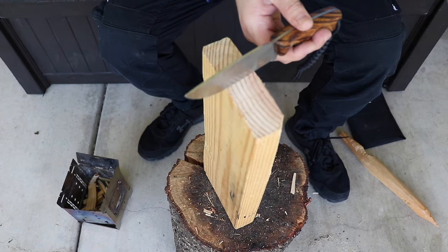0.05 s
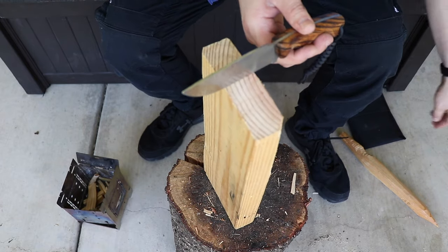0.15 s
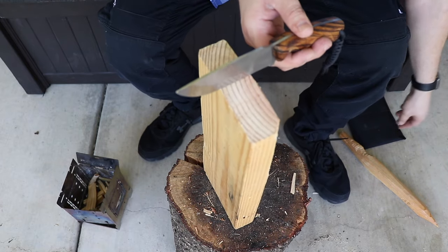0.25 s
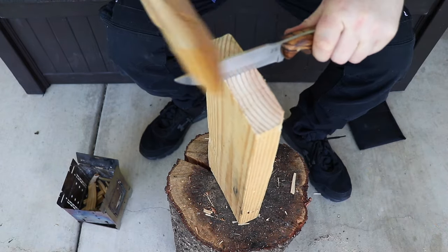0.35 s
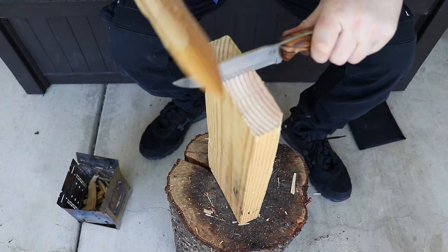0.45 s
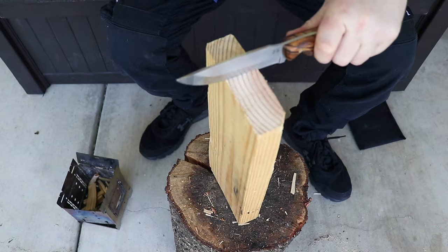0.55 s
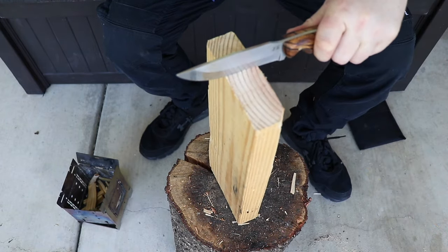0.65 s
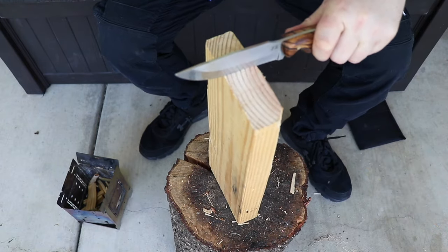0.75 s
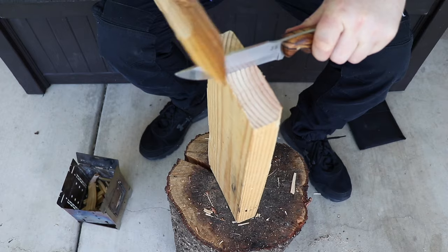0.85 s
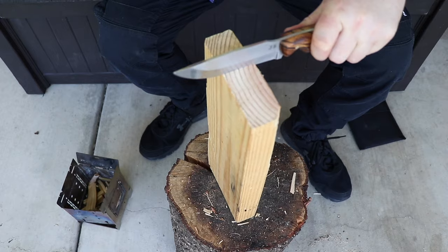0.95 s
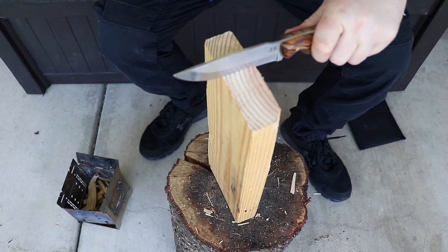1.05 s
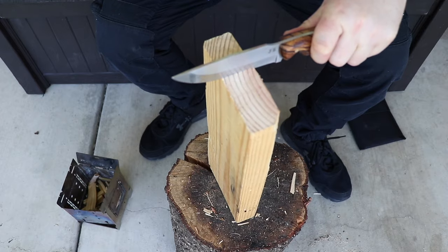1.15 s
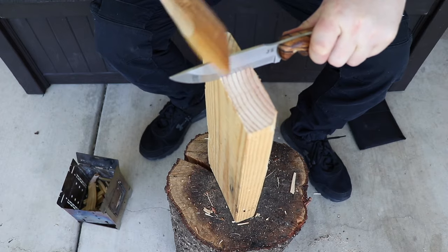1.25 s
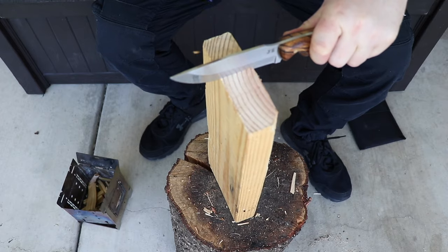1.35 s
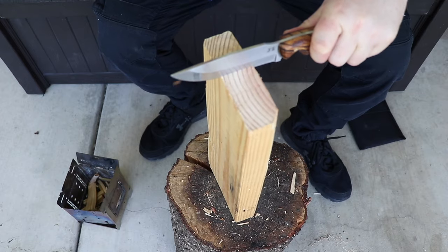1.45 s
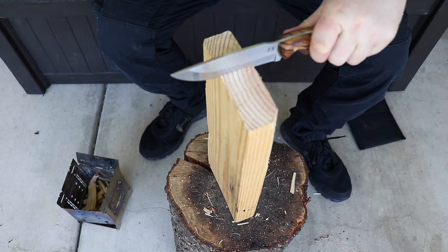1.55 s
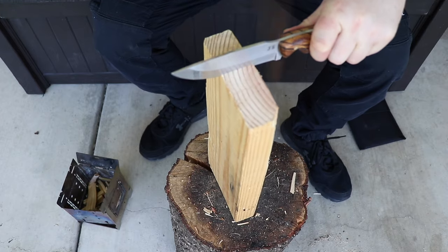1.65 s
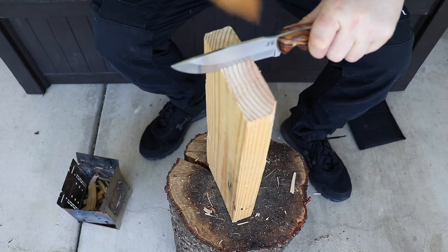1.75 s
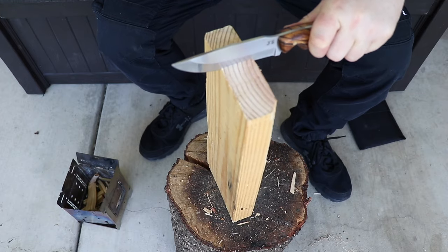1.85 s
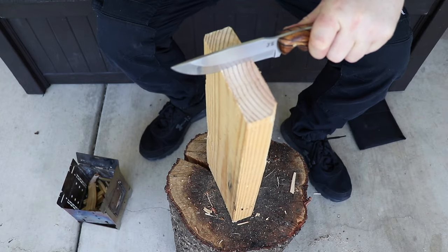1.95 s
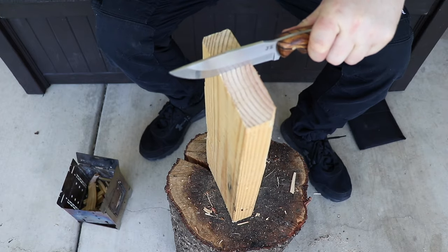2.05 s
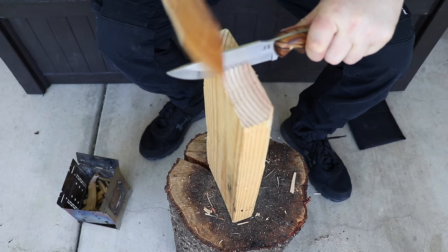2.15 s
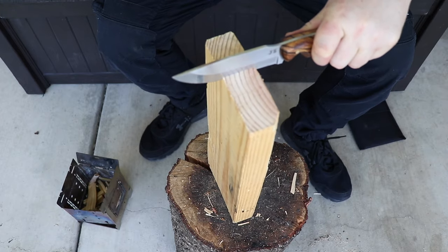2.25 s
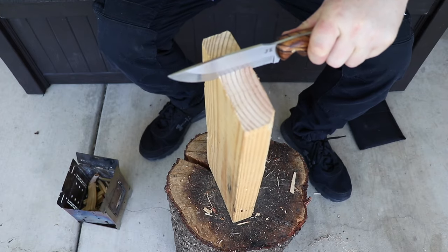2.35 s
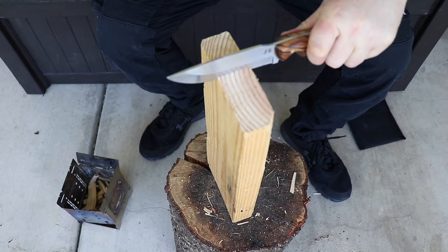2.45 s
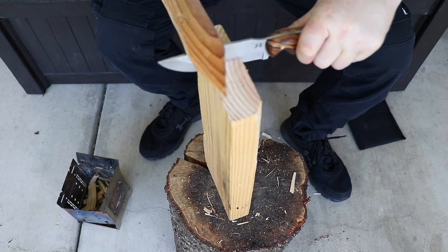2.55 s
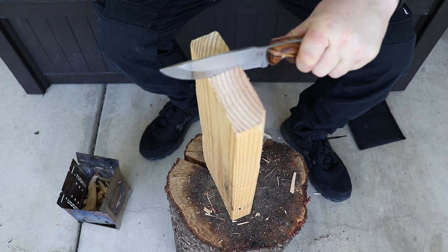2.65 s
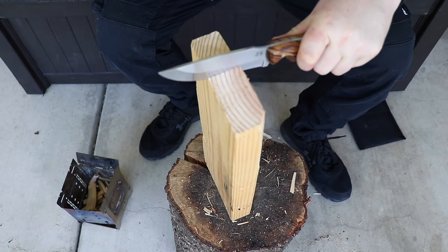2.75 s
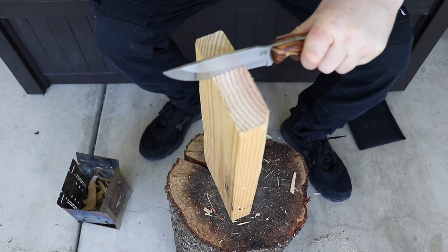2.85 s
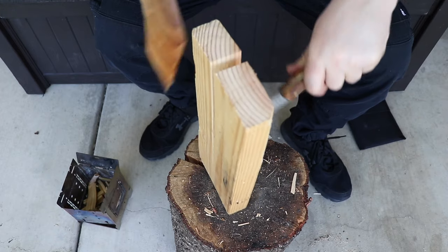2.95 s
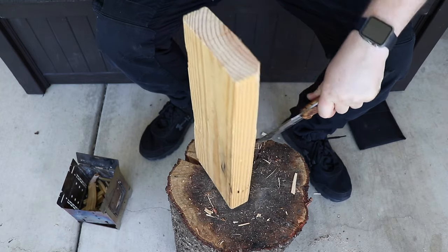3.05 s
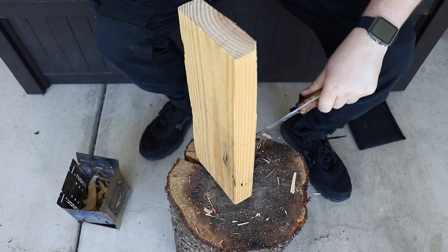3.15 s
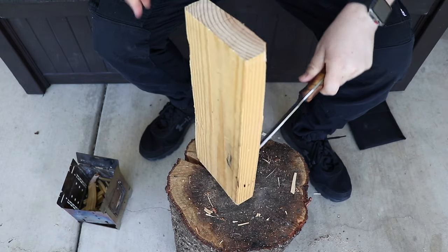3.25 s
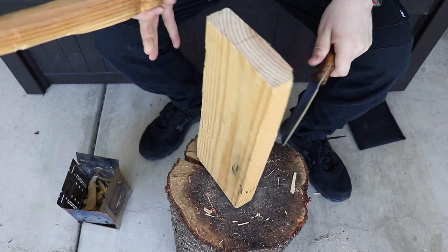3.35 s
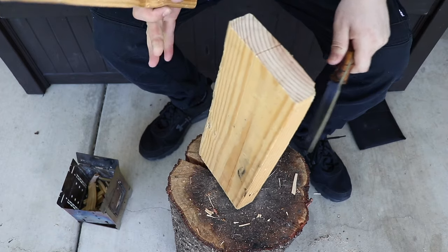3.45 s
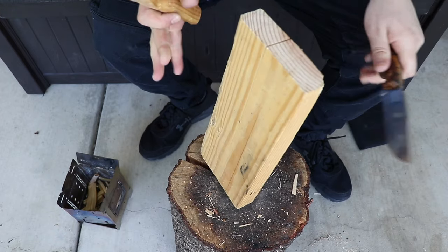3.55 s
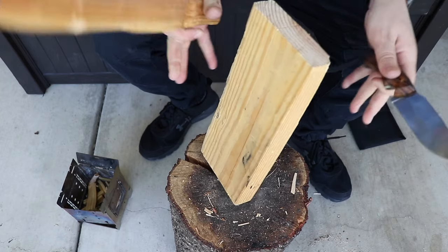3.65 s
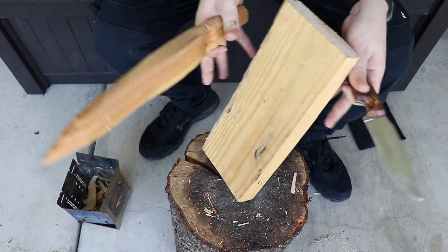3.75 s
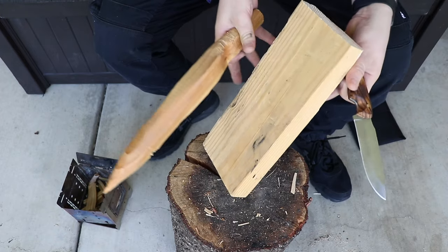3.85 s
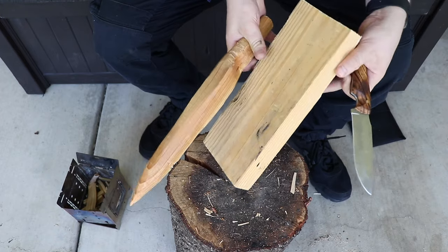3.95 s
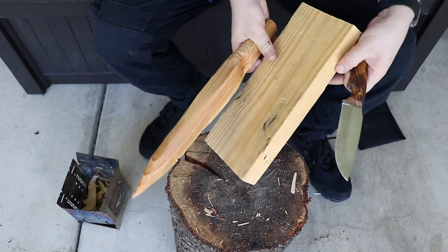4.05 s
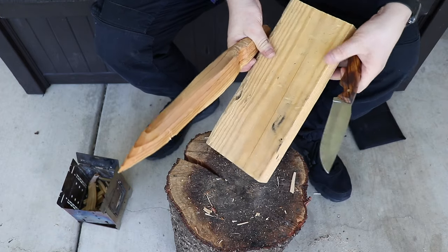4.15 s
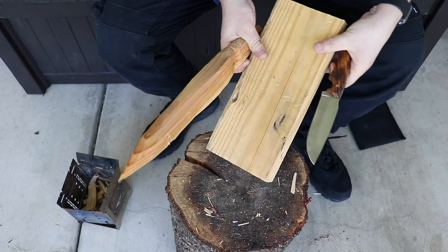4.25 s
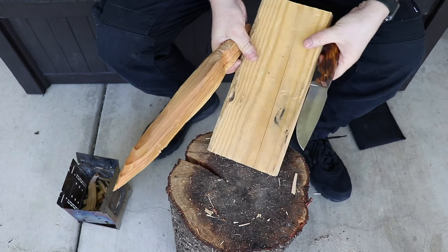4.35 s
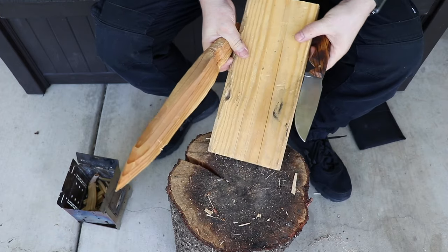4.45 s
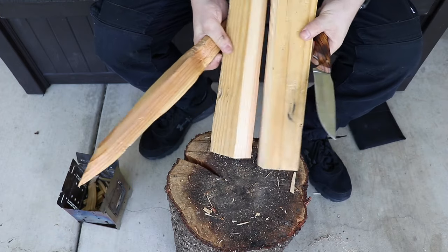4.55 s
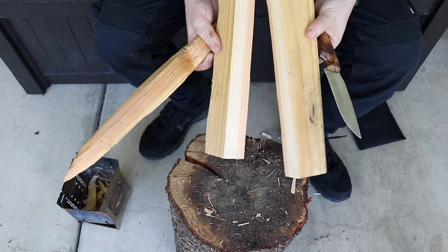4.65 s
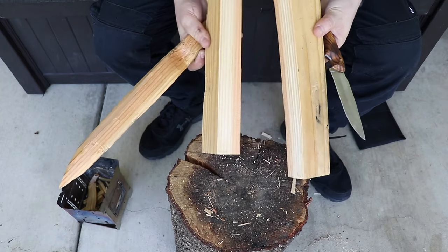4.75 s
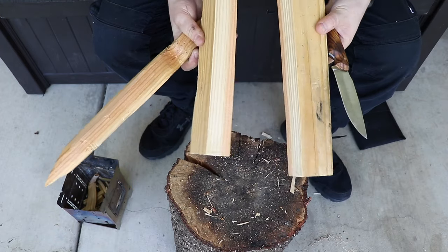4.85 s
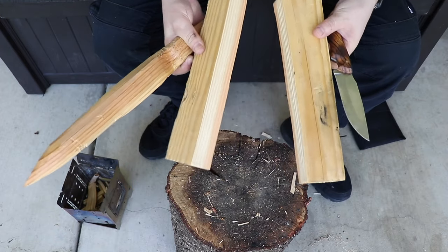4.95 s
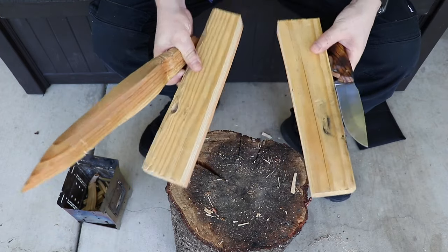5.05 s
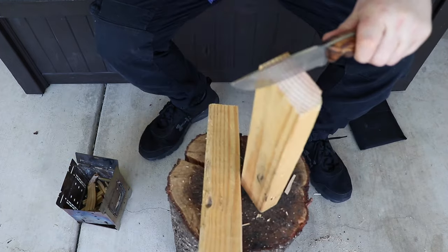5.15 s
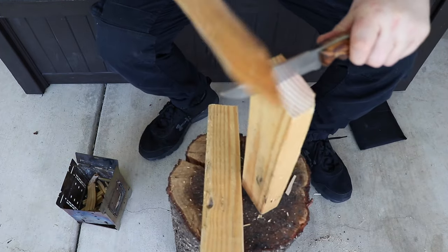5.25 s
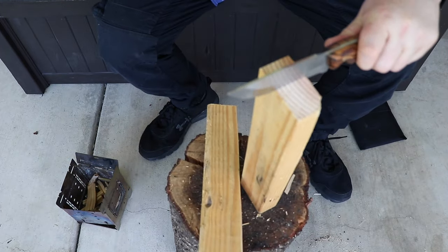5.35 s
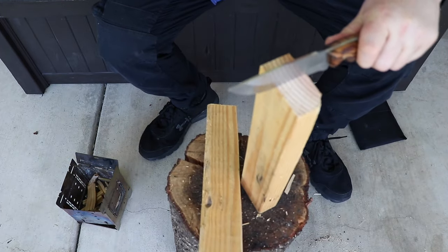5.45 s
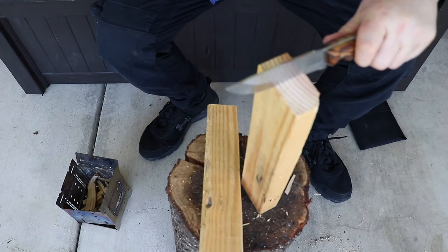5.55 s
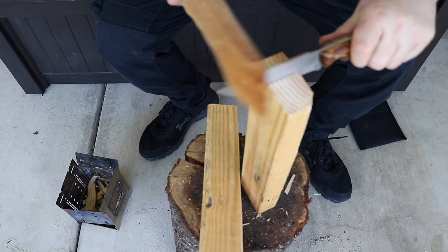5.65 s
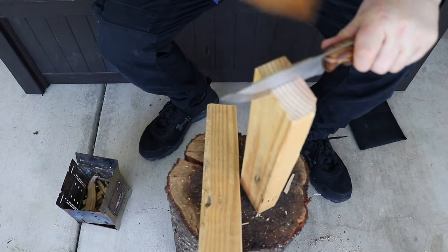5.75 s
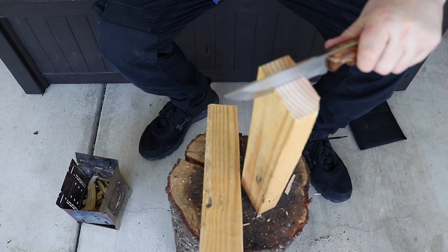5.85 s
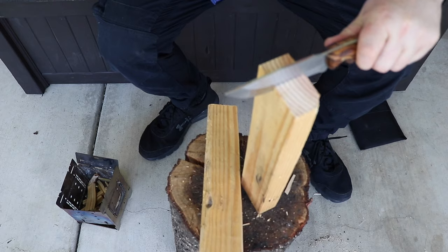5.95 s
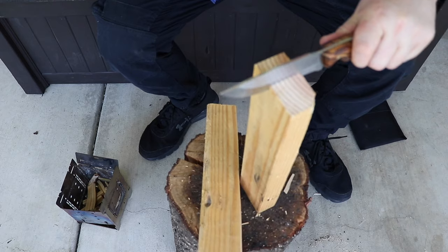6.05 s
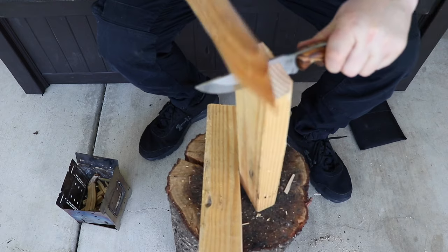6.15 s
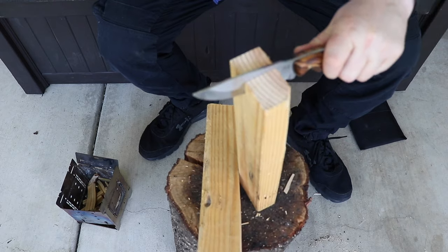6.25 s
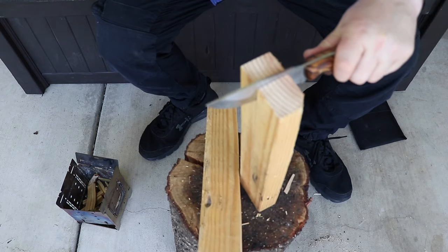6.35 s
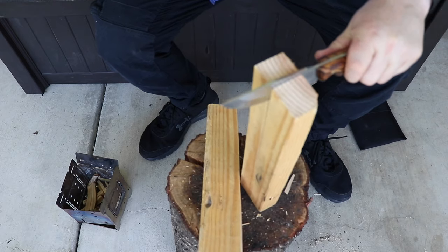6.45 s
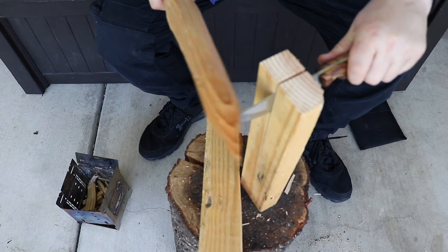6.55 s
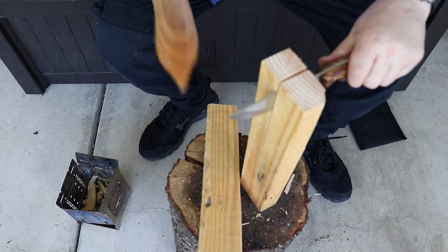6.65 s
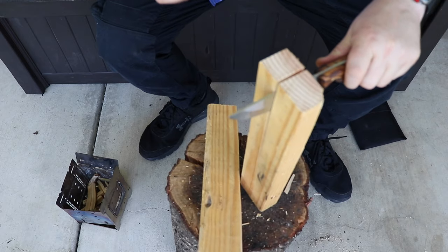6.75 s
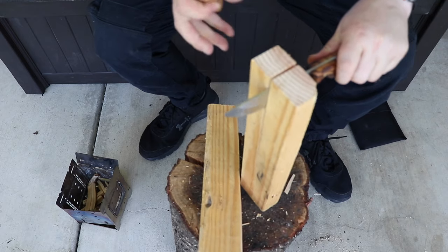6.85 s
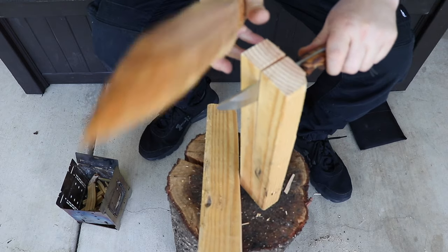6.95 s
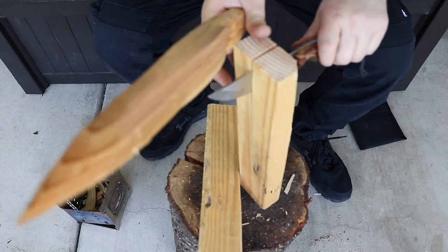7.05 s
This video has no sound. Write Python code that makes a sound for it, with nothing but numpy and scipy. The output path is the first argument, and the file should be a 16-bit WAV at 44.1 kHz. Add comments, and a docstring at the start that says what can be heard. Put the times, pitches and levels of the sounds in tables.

```python
"""Splitting a board with knife and baton

A baton knocks a knife through a board on a log stump, in a hard-floored, walled space. Blows sum damped
modes, a crush burst, a low microphone overload pulse and a rising swish; loud peaks clip. Between the two
series the board is torn (broad rings, noise); light knocks and brushes occur throughout. Echoes, dense
reflections and standing waves answer; friction noise, coloured background noise and a faint hum lie beneath."""
import sys
import numpy as np
from scipy import signal
from scipy.fft import rfft, irfft
from scipy.io import wavfile

SR = 44100
rng = np.random.default_rng(int(sys.argv[2]) if len(sys.argv) > 2 else 0)


def store_wav(level_fs):
    """Save 16-bit WAV to argv[1]."""
    pcm = np.round(np.clip(np.atleast_2d(level_fs), -1, 1) * 32767)
    wavfile.write(sys.argv[1], SR, pcm.T.astype(np.int16))


def linear_from_db(decibels):
    """Turn decibels (scalar or array-like) into linear amplitude factors; 0 gives 1."""
    return 10 ** (np.asarray(decibels, float) / 20)


N = 313551


def at_hz(points_hz, values, hz):
    """Straight lines on a log-frequency axis."""
    return np.interp(np.log(hz), np.log(points_hz), values)


def bell(hz, centre_hz, width_oct):
    """1 at the centre, falling to 0 on a log-frequency axis."""
    return np.exp(-.5 * (np.log2(hz / centre_hz) / width_oct) ** 2)


def clicks(times_s, sizes):
    """One impulse per event."""
    out = np.full(N, 1e-18)
    np.add.at(out, np.round(np.array(times_s) * SR).astype(int), sizes)
    return out


def dying(times_s, sizes, tau_s):
    """An envelope that jumps at each event and dies away."""
    return signal.lfilter([1], [1, -np.exp(-1 / (tau_s * SR))], clicks(times_s, sizes))


def rising(times_s, sizes, tau_s):
    """An envelope that swells towards each event and stops there."""
    return dying(N / SR - times_s, sizes, tau_s)[::-1]


def ring(x, hz, t60_s):
    """Two-pole resonator: a unit click sets a dying sine of height 1 ringing."""
    radius = linear_from_db(-60 / (t60_s * SR))
    angle = 2 * np.pi * hz / SR
    return signal.lfilter([0, np.sin(angle)], [1, -2 * radius * np.cos(angle), radius * radius], x)


def band(x, low_hz, high_hz):
    """Band-pass; rms 1."""
    sos = signal.butter(2, [low_hz, min(high_hz, .45 * SR)], "band", fs=SR, output="sos")
    y = signal.sosfilt(sos, x)
    return y / np.sqrt(np.mean(y ** 2))


# baton blows: (time [s], strength [dB], pitch favoured by the gripped blade [Hz], its boost [dB],
# low pulse from lopsided overload of the microphone input, rms over 30 ms [dB])
BATON_BLOWS = [(0.377, -1.5, 2400, 2.5, -36.5), (0.837, 1.5, 2200, 12.5, -35), (1.2634, 2, 2100, 2, -14.5),
               (1.696, 2, 3500, -2.5, -29.5), (2.1228, 1, 4140, 2, -33), (2.5401, 2, 2630, 10, -31),
               (2.9549, 1, 3100, 3, -26), (5.2029, 1.5, 4677, 2.5, -15.5), (5.6666, 1, 4800, 1, -27),
               (6.1109, -1, 2968, 3.5, -26.5), (6.5736, -8, 1450, 4.5, -52.5)]


def blows(responses):
    """Each blow sounds from a slightly different spot of the room, so it has its own response."""
    out = np.zeros(N + SR)
    for row, response in zip(BATON_BLOWS, responses):
        sound = signal.fftconvolve(thin_bass(blow(row), pulse_db=row[-1]), response)
        start = round(row[0] * SR)
        out[start:start + len(sound)] += sound
    return out[:N]


# board, baton and blade struck together:
# (nominal frequency [Hz], relative level [dB], t60 before damping [s])
STRUCK_MODES = [(162, -18, 0.034), (241, -5.5, 0.0089), (353, -7.5, 0.045), (456, 0, 0.01),
                (778, -0.5, .012), (1031, -3, 0.025), (1223, -4, 0.021), (1455, 0.5, 0.015),
                (1747, -1, 0.016), (1920, -5, 0.036), (2252, 1.5, .017), (3100, -16, 0.068),
                (4010, -13.5, 0.02), (4600, -14.5, 0.014), (6540, -16.5, 0.029), (7060, -22.5, 0.014),
                (8700, -16.5, 0.0057)]
DAMPING_TAU_S = .02   # hands and stump damp whatever rings longer


def blow(row):
    """One blow strikes all modes, each as hard as its contact favours it, and crushes fibres."""
    detune, uneven = rng.standard_normal((2, len(STRUCK_MODES)))
    click = np.r_[1, np.zeros(SR // 10 - 1)]
    body = np.zeros(len(click))
    for k, (hz, level_db, t60_s) in enumerate(STRUCK_MODES):
        size = (-1) ** k * linear_from_db(level_db + colour(row, hz) + 1.2 * uneven[k])
        # blade depth and grip differ each time: pitches shift a little
        body += size * ring(click, hz * (1 + 0.02 * detune[k]), t60_s)
    body, fibres = rfft(body), crack(row, size=len(click))
    # body and fibres radiate from different surfaces: their powers add
    strength = np.hypot(np.abs(body), np.abs(fibres))
    sound = irfft(strength * np.exp(1j * np.angle(body + fibres)), len(click))
    return sound * np.exp(-np.arange(len(click)) / (DAMPING_TAU_S * SR))


# colour of fibres breaking under the edge: (frequency [Hz], relative level [dB])
CRACK_COLOUR = [(100, -19.5), (300, -2.5), (1000, -2.5), (2300, -0.5), (3000, -1.5), (5000, -10),
                (8000, -14.5), (16000, -29)]
CRACK_GAIN_DB, CRACK_TAU_S = 26.5, 0.0032


def crack(row, size):
    """Spectrum of a dying random burst: many small breaks add up to a smooth colour."""
    crack_hz, crack_db = np.transpose(CRACK_COLOUR)
    burst = rfft(rng.standard_normal(size) * np.exp(-np.arange(size) / (CRACK_TAU_S * SR)))
    hz = np.maximum(np.fft.rfftfreq(size, 1 / SR), 1)
    tone = linear_from_db(CRACK_GAIN_DB + at_hz(crack_hz, crack_db, hz) + colour(row, hz))
    return tone * burst / np.abs(burst)


# colour of a blow on the whole board: (frequency [Hz], gain [dB])
WHOLE_BOARD_COLOUR = [(180, 6.5), (430, 5), (950, 5.5), (1450, 7), (2200, 1), (3100, 2), (4900, 1),
                      (8000, 4), (14000, 3)]
# colour of a blow on the split half: (frequency [Hz], gain [dB])
HALF_BOARD_COLOUR = [(180, 2), (430, 1.5), (950, 5), (1450, 6.8), (2300, 2), (3000, 5), (3500, 1.3),
                     (4850, 12), (5500, 0.67), (7700, 7), (14000, 6)]
SPLIT_S = 4.5
UPPER_RATIO_WHOLE, UPPER_RATIO_HALF = 2.0, 1.6   # pitch of the upper favoured band over the lower
BLADE_WIDTH_OCT, UPPER_BOOST_SHARE = .14, .9


def colour(row, hz):
    """Gain in dB by pitch: the board, the band favoured by the blade and its upper partner."""
    time_s, strength_db, blade_hz, boost_db, _ = row
    board, ratio = WHOLE_BOARD_COLOUR, UPPER_RATIO_WHOLE
    if time_s >= SPLIT_S:
        board, ratio = HALF_BOARD_COLOUR, UPPER_RATIO_HALF
    lower = bell(hz, blade_hz, BLADE_WIDTH_OCT)
    upper = UPPER_BOOST_SHARE * bell(hz, ratio * blade_hz, BLADE_WIDTH_OCT)
    return strength_db + at_hz(*np.transpose(board), hz) + boost_db * (lower + upper)


# below WEAK_PULSE_DB of overload pulse the bass edge climbs from BASS_HZ
WEAK_PULSE_DB, BASS_OCT_PER_DB, BASS_HZ = -39.5, .22, 45


def thin_bass(sound, pulse_db):
    """Blows with a weak overload pulse, such as the glancing last one, sound thinner in the bass."""
    cut_hz = BASS_HZ * 2 ** (BASS_OCT_PER_DB * max(WEAK_PULSE_DB - pulse_db, 0))
    return signal.sosfilt(signal.butter(3, cut_hz, "high", fs=SR, output="sos"), sound)


PULSE_S, PULSE_LAG_S = .008, .002


def overload_pulse():
    """Lopsided overload of the microphone input, as one short low pulse added at each blow."""
    rows = np.array(BATON_BLOWS)
    hump = np.hanning(round(PULSE_S * SR))
    hump /= -np.sqrt(np.sum(hump ** 2) / (.03 * SR))   # rms 1 over 30 ms
    return signal.fftconvolve(clicks(rows[:, 0] + PULSE_LAG_S, linear_from_db(rows[:, -1])), hump)[:N]


SWISH_DB, SWISH_TAU_S = -62, 0.035   # level at contact


def swish():
    """Air rushing past the falling baton: noise that rises up to each blow."""
    times_s = np.array(BATON_BLOWS)[:, 0]
    return rising(times_s, linear_from_db(SWISH_DB), SWISH_TAU_S) * band(rng.standard_normal(N), 300, 7000)


# fibres snapping in the tear: (time [s], level before high-pass [dB], centre frequency [Hz])
FIBRE_SNAPS = [(4.4878, -35, 8500), (4.5058, -40, 8500), (4.5105, -24, 3500), (4.514, -22, 3500),
               (4.5186, 2, 4600), (4.5342, -1, 6500)]


def tearing():
    """Each snapping fibre is a very short broad ring; splinter noise and a woody band trail behind it."""
    rings = sum(ring(clicks([s], linear_from_db(db)), hz, 0.0025) for s, db, hz in FIBRE_SNAPS)
    snaps = signal.lfilter(*signal.butter(2, 1500, "high", fs=SR), rings)   # tiny sources radiate no bass
    s, db, _ = np.transpose(FIBRE_SNAPS)
    noise = rng.standard_normal((2, N))
    spray_envelope = dying(s, linear_from_db(db - 12), .0005) + dying(s, linear_from_db(db - 26.5), 0.0087)
    spray = spray_envelope * band(noise[0], 2600, 15000)
    woody = dying(s, linear_from_db(db - 27), .008) * band(noise[1], 3400, 4150)
    return snaps + spray + woody


# light knocks of wood on wood as the board rocks, is handled and parts:
# (time [s], strike level [dB], pitch of the modes struck most [Hz])
LIGHT_KNOCKS = [(0.279, -51.5, 2250), (3.084, -20, 1150), (3.244, -38.5, 2040), (3.271, -37, 2210),
                (3.29, -43, 197), (3.379, -22, 433), (3.387, -36.5, 200), (3.44, -39, 169),
                (3.748, -41.5, 2120), (3.756, -46, 704), (3.791, -51.5, 1957), (4.117, -46, 680),
                (4.167, -53, 1900), (4.378, -50.5, 1496), (4.488, -33.5, 1870), (4.511, -19.5, 1920),
                (4.513, -28, 510), (4.519, -27.5, 2580), (4.5342, -28.5, 2060), (4.898, -50.5, 1500),
                (4.923, -56.5, 1480), (5.09, -51, 2058), (7.083, -36, 643), (7.085, -42.5, 2360)]
# loose board, rocking or held: (frequency [Hz], relative level before low-pass [dB], t60 [s])
LOOSE_MODES = [(165, 0, .04), (200, 0, .035), (395, 0, .018), (510, -2, .03), (640, -2, .015),
               (1170, 0, .015), (1480, -2, .045), (1850, 0, .035), (2040, -1, .07), (2260, -6, .02),
               (2620, -4, .12), (3100, -10, .05), (4150, -3, .07), (4930, -5, .06)]
# band struck most, its octave, all modes
KNOCK_WIDTH_OCT, KNOCK_OCTAVE_DB, KNOCK_REACH_DB = .12, -8, -40


def handling():
    """Knocks ring the loose board's modes, those near the knock's pitch and its octave most."""
    s, db, centre_hz = np.transpose(LIGHT_KNOCKS)
    out = np.zeros(N)
    for hz, level_db, t60_s in LOOSE_MODES:
        near = bell(hz, centre_hz, KNOCK_WIDTH_OCT)
        octave = linear_from_db(KNOCK_OCTAVE_DB) * bell(hz, 2 * centre_hz, 2 * KNOCK_WIDTH_OCT)
        sizes = linear_from_db(db + level_db) * (near + octave + linear_from_db(KNOCK_REACH_DB))
        out += ring(clicks(s, sizes), hz, t60_s)
    return signal.lfilter(*signal.butter(1, 3000, fs=SR), out)   # soft contacts


# dry brushes of hand, cloth and splinters: (time [s], level [dB], centre frequency [Hz])
DRY_BRUSHES = [(1.446, -51.5, 11500), (1.522, -58.5, 10200), (1.948, -57.5, 9200), (2.443, -62, 8570),
               (3.238, -49, 5400), (3.271, -42.5, 5350), (3.319, -50, 6100), (3.747, -49, 5200),
               (3.791, -52.5, 5700), (3.999, -55, 5900), (6.802, -58, 9000), (6.82, -57, 7720),
               (7.083, -66, 5450)]
BRUSH_PEAK_S = .0025   # time from onset to peak
# the sleeve brushes as the arm starts down
SLEEVE_LEAD_S, SLEEVE_DB, SLEEVE_HZ, SLEEVE_PEAK_S = 0.057, -64.5, 7000, .005
SLEEVE_SPREAD_S, SLEEVE_SPREAD_DB = .008, 3


def brushes():
    """Friction as short swelling and fading noise bands: single brushes, and a sleeve before each blow."""
    rows = [(s, db, BRUSH_PEAK_S, hz) for s, db, hz in DRY_BRUSHES]
    chance = rng.standard_normal((len(BATON_BLOWS), 2)) * [SLEEVE_SPREAD_S, SLEEVE_SPREAD_DB]
    for row, (shift_s, shift_db) in zip(BATON_BLOWS, chance):
        rows.append((row[0] - SLEEVE_LEAD_S + shift_s, SLEEVE_DB + shift_db, SLEEVE_PEAK_S, SLEEVE_HZ))
    out, t = np.zeros(N), np.arange(SR // 10) / SR
    for s, db, peak_s, hz in rows:
        hiss = band(rng.standard_normal(len(t)), hz / 1.6, hz * 1.6)
        stroke = linear_from_db(db) * t / peak_s * np.exp(1 - t / peak_s) * hiss
        start = round(s * SR)
        out[start:start + len(t)] += stroke[:N - start]
    return out


# movement of hands, cloth and wood, one list per stretch: (time [s], level before clumping [dB])
MOVEMENT = [
    [(0.0, -59), (0.1, -80), (0.2, -68), (0.35, -53)],
    [(3.4, -55), (3.51, -82), (3.726, -83), (3.756, -51.5), (3.9, -69), (4.02, -58.5), (4.182, -71),
     (4.326, -65), (4.47, -86)],
    [(4.7, -80), (4.824, -89), (4.954, -71), (5.094, -65), (5.17, -71)],
    [(6.9, -81), (7.008, -56.5), (7.07, -76)],
]
# creaks of the cracked board: (time of the peak [s], level before clumping [dB])
BOARD_CREAKS = [(3.795, -65), (4.12, -64), (4.17, -65), (4.255, -52.5), (4.69, -78), (5.09, -65)]
CREAK_RISE_TAU_S, CREAK_FALL_TAU_S = 0.0071, .03
RUSTLE_DB, RUSTLE_FOLLOWS = -80.5, .5   # before clumping, at a movement of -67 dB; share of its swing


def shuffle():
    """Friction in uneven clumps: a dull layer, a brighter one, and a creak in a board resonance."""
    move_db = in_time(MOVEMENT)
    clumps = linear_from_db(3.0 * band(rng.standard_normal((3, N)), 4, 40))
    grains = rng.standard_normal((3, N)) * clumps
    s, db = np.transpose(BOARD_CREAKS)
    swell = dying(s, linear_from_db(db), CREAK_FALL_TAU_S) + rising(s, linear_from_db(db), CREAK_RISE_TAU_S)
    dull = linear_from_db(move_db) * band(grains[0], 100, 450)
    bright = linear_from_db(RUSTLE_DB + RUSTLE_FOLLOWS * (move_db + 67)) * band(grains[1], 1200, 6400)
    return dull + bright + swell * band(grains[2], 1860, 1990)


def in_time(tables, silent_db=-100):
    """Levels of several tables, joined in time, near silence between the tables."""
    rows = []
    for table in tables:
        rows += [(table[0][0] - .05, silent_db), *table, (table[-1][0] + 0.0233, silent_db)]
    s, db = np.transpose(rows)
    return np.interp(np.arange(N) / SR, s, db)


# first strong echoes: (delay [s], level before low-pass [dB])
FIRST_ECHOES = [(.0016, -20), (.008, -14), (.0125, -7), (.019, -10), (.026, -9), (.034, -15), (.052, -16)]
# dense reflections: (frequency [Hz], t60 [s], relative level [dB])
REVERBERATION = [(50.3, 0.18, -6), (119, 0.64, 0.5), (378, 0.65, -13), (890, 0.4, -4), (2370, 0.41, -7),
                 (6500, 0.36, -11), (13900, 0.2, -9)]
# standing waves between floor and walls; the close pair swells late:
# (frequency [Hz], level [dB], t60 [s])
STANDING_WAVES = [(74.5, -62, 0.49), (158.1, -54, .5), (163.8, -56.5, 0.72), (276, -60.5, 0.48),
                  (382, -64, .6)]
ECHO_CUT_HZ = 850   # rough walls scatter the treble
ROOM_RISE_TAU_S = .006
ALIKE_BELOW_HZ = 600   # a small shift of the source changes the reflections only above this


def room(count):
    """Responses: direct sound, dull floor and wall echoes, dense reflections, low standing waves."""
    t = np.arange(int(.8 * SR)) / SR
    table_hz, table_t60_s, table_db = np.transpose(REVERBERATION)
    echoes = np.zeros(len(t))
    for lag_s, db in FIRST_ECHOES:
        echoes[round(lag_s * SR)] += linear_from_db(db)
    echoes = signal.lfilter(*signal.butter(1, ECHO_CUT_HZ, fs=SR), echoes)
    echoes[0] = 1   # direct sound
    responses = np.tile(echoes, (count, 1))
    edges_hz = 35 * 2 ** np.arange(0, 9.1, .5)
    white = rng.standard_normal((2, count, len(t)))
    for k, (low_hz, high_hz) in enumerate(zip(edges_hz, edges_hz[1:])):
        hz = np.sqrt(low_hz * high_hz)
        share = np.sqrt((high_hz - low_hz) / (SR / 2) / (.02 * SR))   # amplitude by bandwidth
        fall = linear_from_db(at_hz(table_hz, table_db, hz) - 60 * t / at_hz(table_hz, table_t60_s, hz))
        envelope = share * fall * (1 - np.exp(-t / ROOM_RISE_TAU_S))
        noise = white[k % 2, :1] if hz < ALIKE_BELOW_HZ else white[k % 2]
        responses += envelope * band(noise, low_hz, high_hz)
    for k, (hz, db, t60_s) in enumerate(STANDING_WAVES):
        responses += (-1) ** k * linear_from_db(db - 60 * t / t60_s) * np.sin(2 * np.pi * hz * t)
    return responses


# background noise colour: (frequency [Hz], relative level [dB per Hz])
AIR_COLOUR = [(15, -8.5), (30, -3), (102, -3.5), (180, -1), (249, -2.5), (695, -10.5), (2410, -19.5),
              (6000, -28), (16000, -31)]
AIR_RMS_DB = -61
# distant machine: (frequency [Hz], rms level [dB])
MACHINE_HUM = [(71, -66.5), (238, -69.5)]


def air():
    """Steady noise shaped in frequency, and a faint hum of narrow noise bands."""
    hz = np.maximum(np.fft.rfftfreq(N, 1 / SR), 1)
    noise = irfft(rfft(rng.standard_normal(N)) * linear_from_db(at_hz(*np.transpose(AIR_COLOUR), hz)), N)
    hum = sum(linear_from_db(db) * band(rng.standard_normal(N), f - 3, f + 3) for f, db in MACHINE_HUM)
    return linear_from_db(AIR_RMS_DB) * noise / np.sqrt(np.mean(noise ** 2)) + hum


HANDS_ROOM_DB = -5   # the hands work nearer the microphone, so the room answers less


def scene():
    """Everything struck, brushed or torn sounds in the room; pulse, swish, friction and air are added dry."""
    *at_blows, at_hands = room(count=len(BATON_BLOWS) + 1)
    at_hands = np.r_[at_hands[0], linear_from_db(HANDS_ROOM_DB) * at_hands[1:]]
    hands = signal.fftconvolve(tearing() + handling() + brushes(), at_hands)[:N]
    return (blows(at_blows) + overload_pulse() + swish() + hands + shuffle() + air())[None]


def band_limit(x):
    """A steep low-pass at the top of the band."""
    return signal.sosfilt(signal.butter(12, 16440, fs=SR, output="sos"), x)


MIC_LOW_HZ = 31.4
TOP_HZ = 15800   # the top is 40 dB down from here


def record(dry):
    """The microphone cuts the lowest bass; the extreme treble is missing; peaks clip at full scale."""
    cut = signal.sosfilt(signal.butter(1, MIC_LOW_HZ, "high", fs=SR, output="sos"), dry)
    cut = signal.sosfilt(signal.cheby2(10, 40, TOP_HZ, fs=SR, output="sos"), cut)
    mix = np.clip(cut, -1, 1)
    return band_limit(mix)


dry = scene()
out = record(dry)
store_wav(out)
```